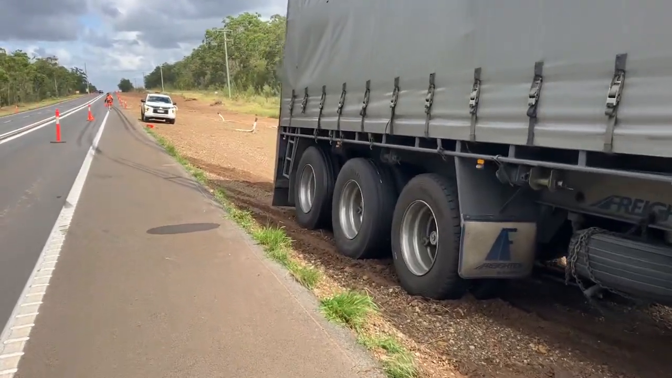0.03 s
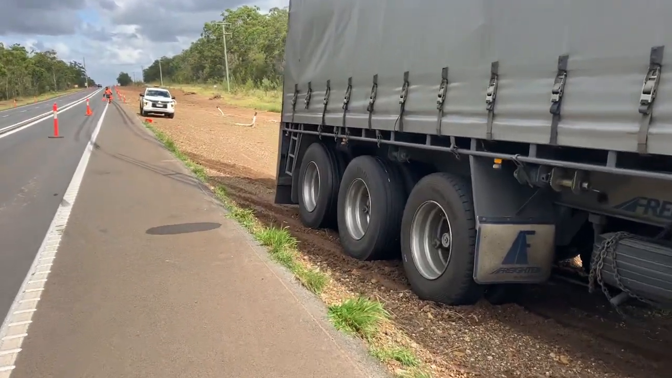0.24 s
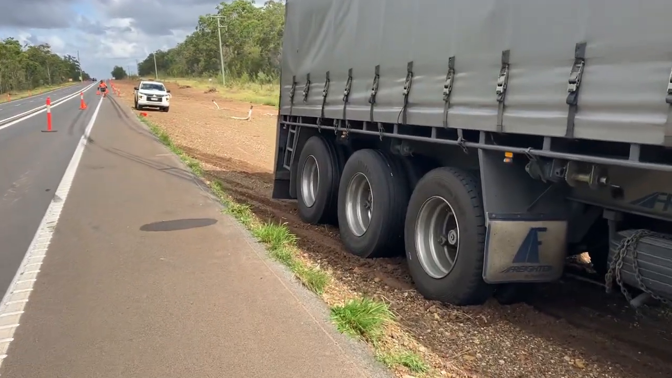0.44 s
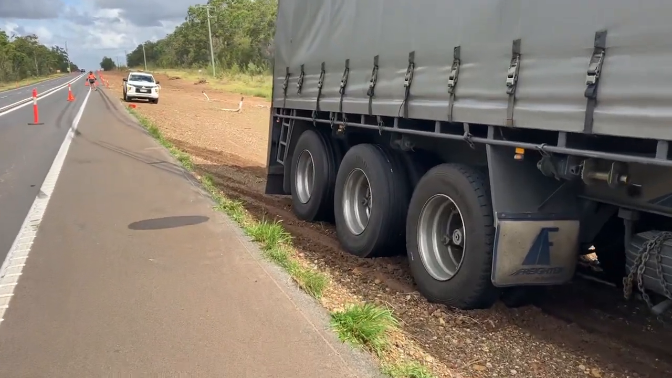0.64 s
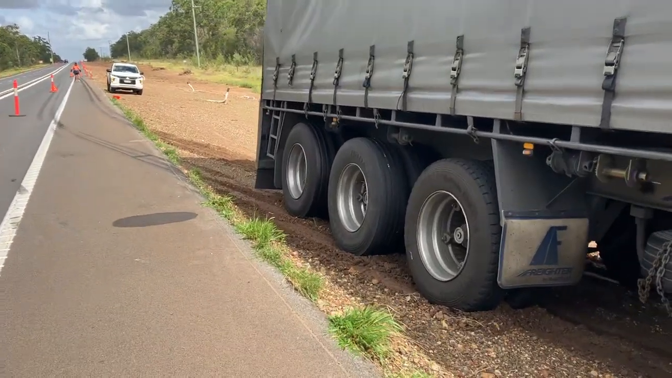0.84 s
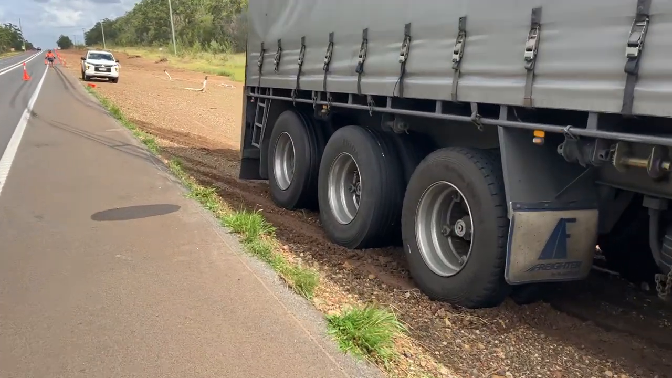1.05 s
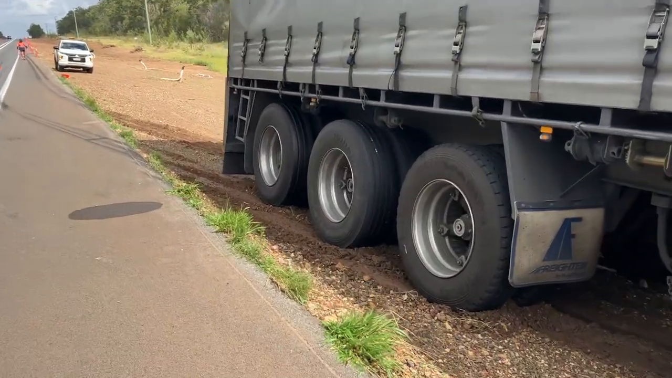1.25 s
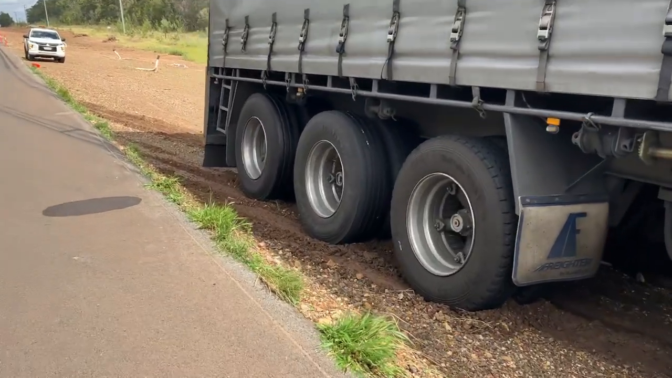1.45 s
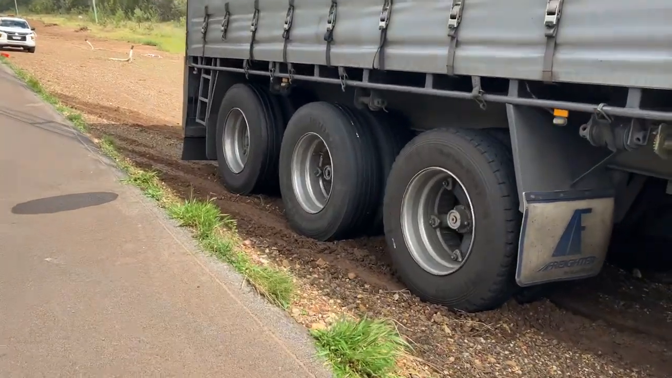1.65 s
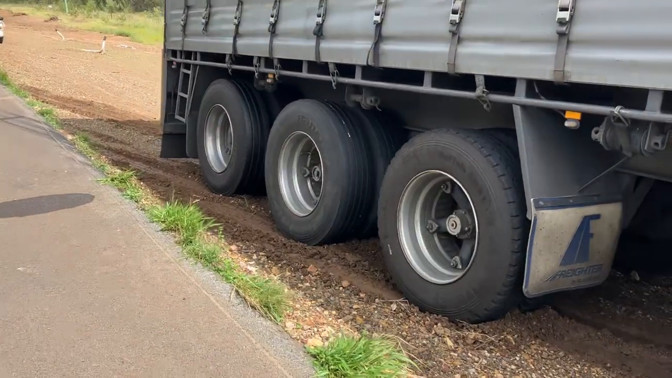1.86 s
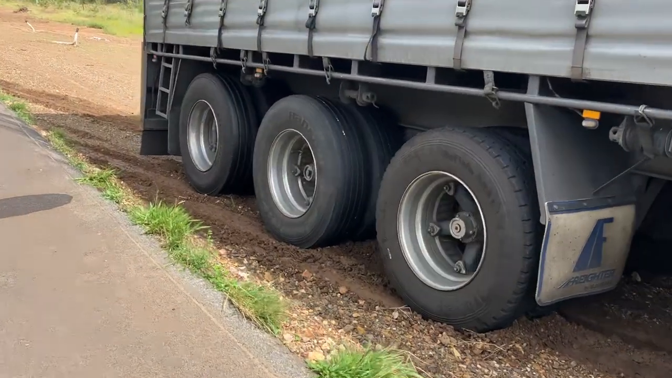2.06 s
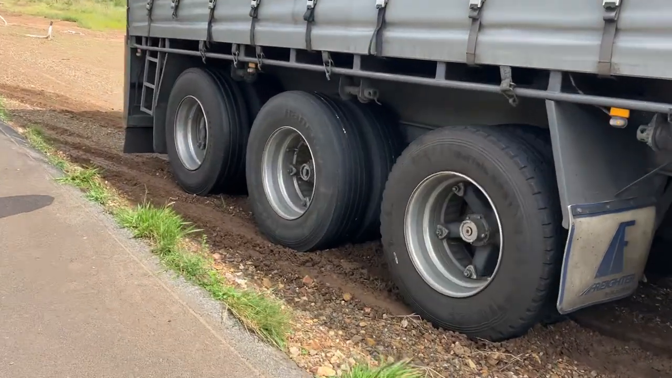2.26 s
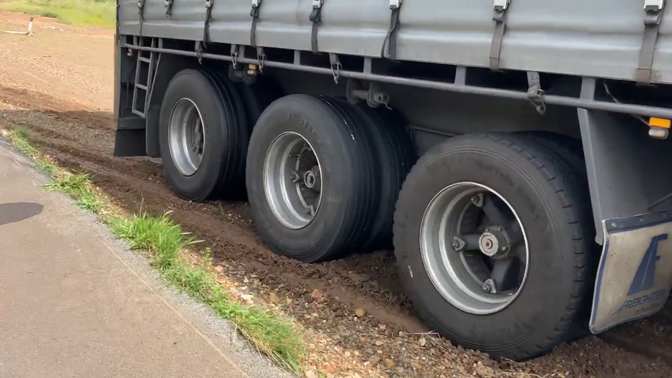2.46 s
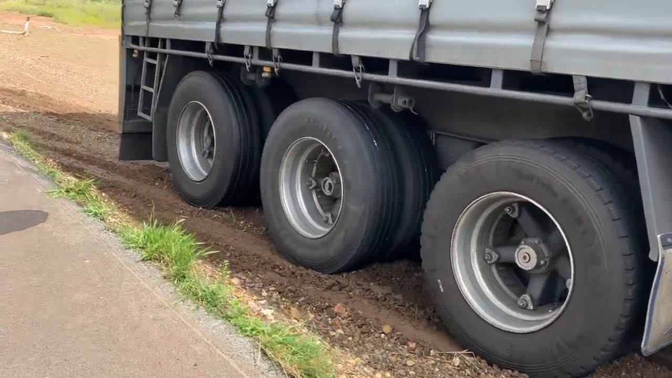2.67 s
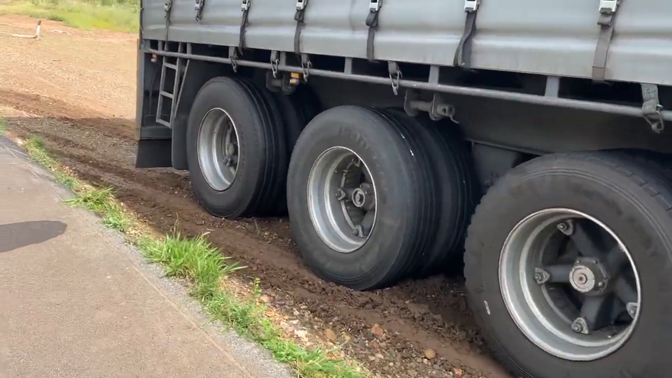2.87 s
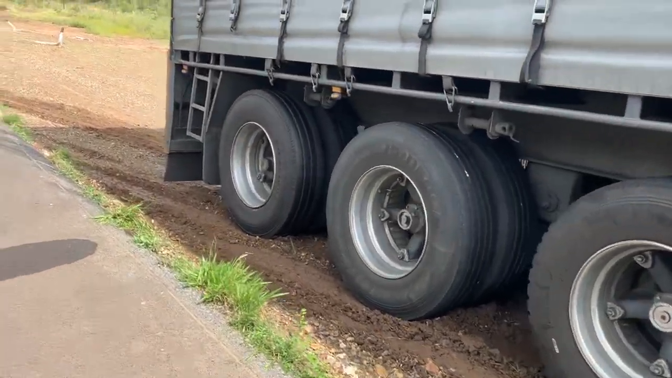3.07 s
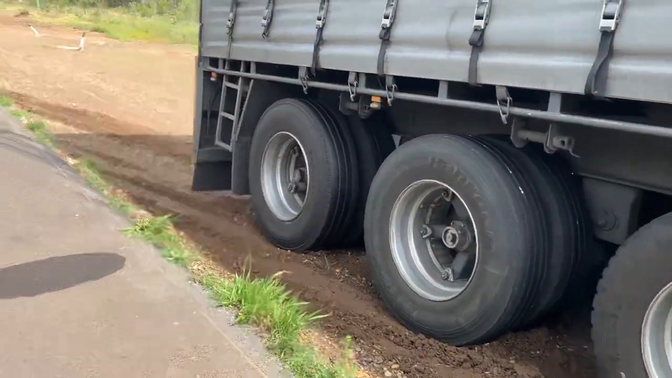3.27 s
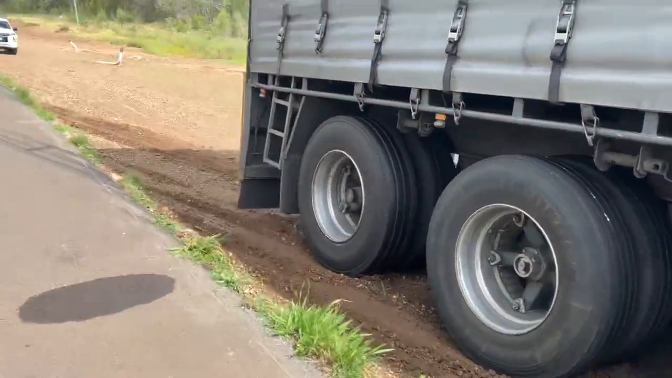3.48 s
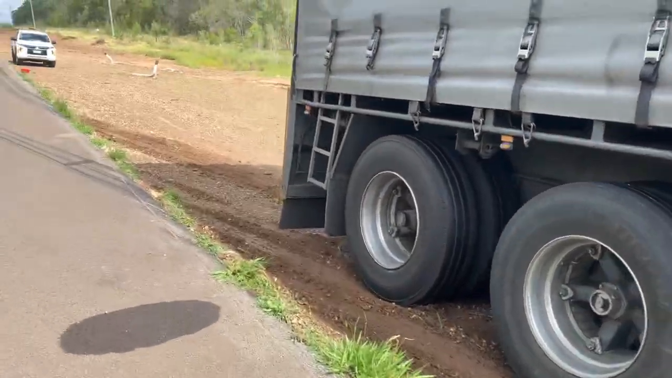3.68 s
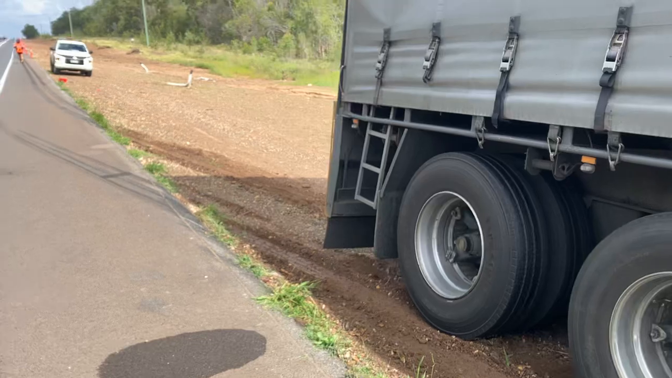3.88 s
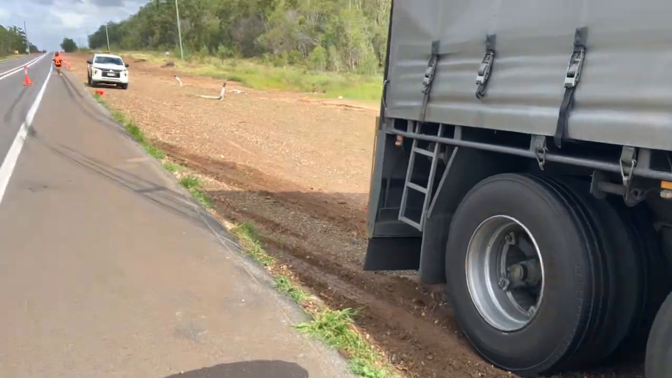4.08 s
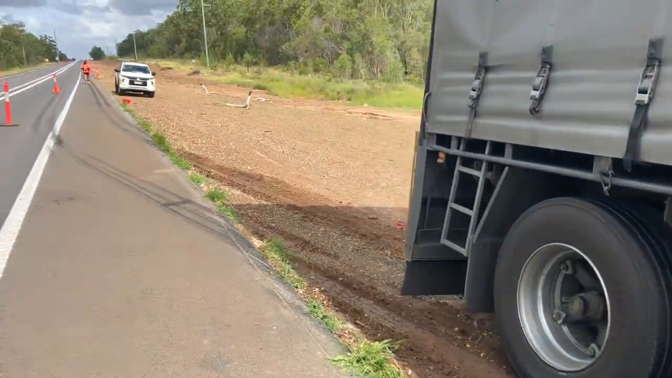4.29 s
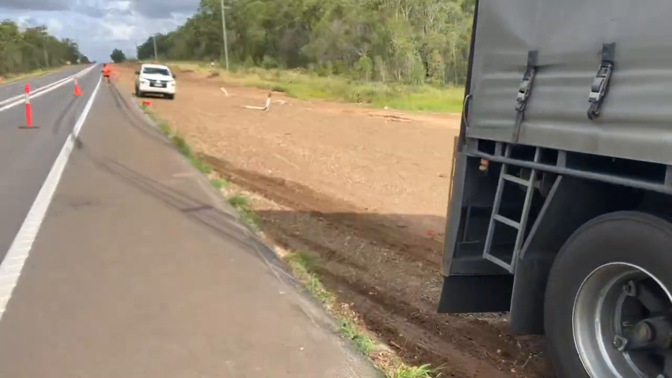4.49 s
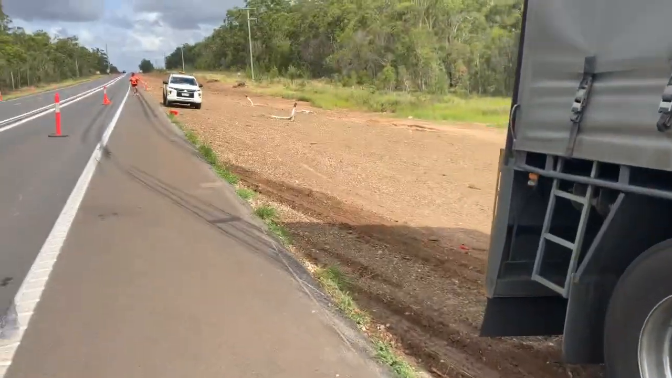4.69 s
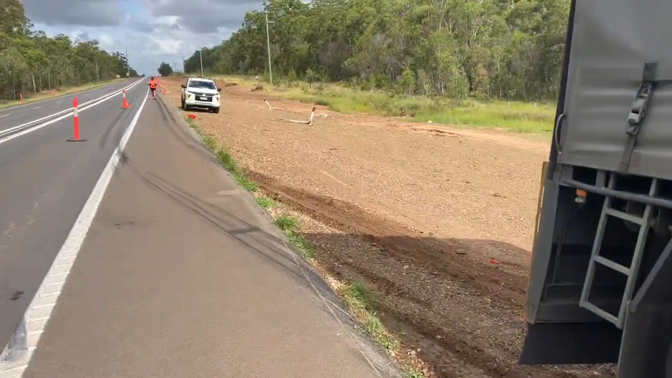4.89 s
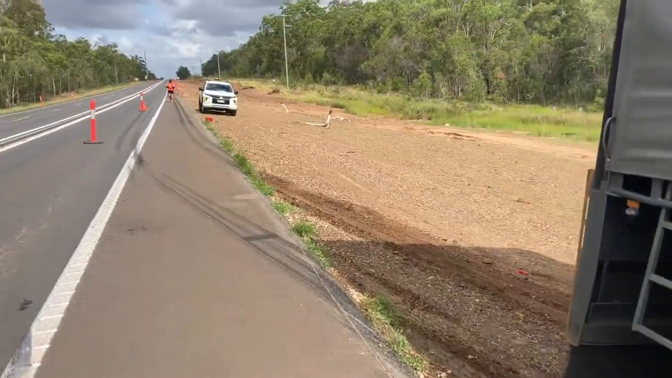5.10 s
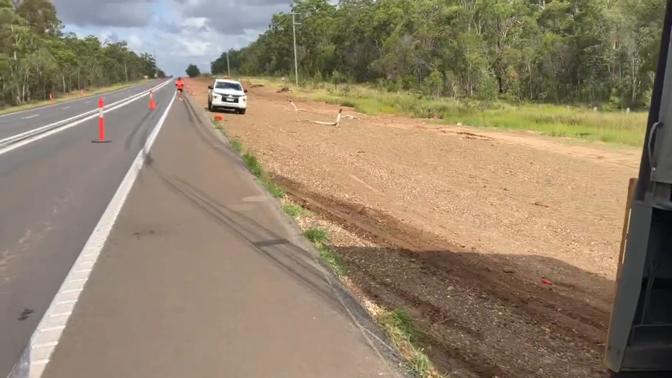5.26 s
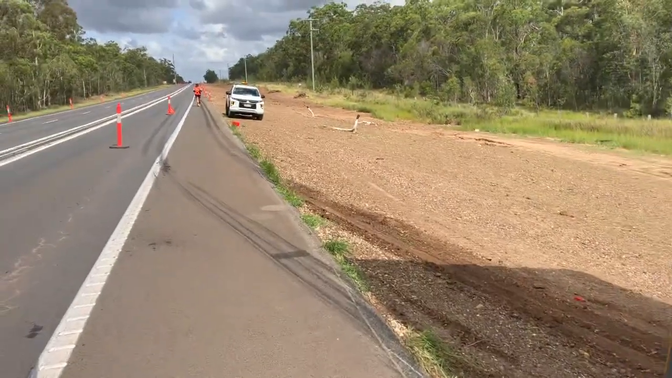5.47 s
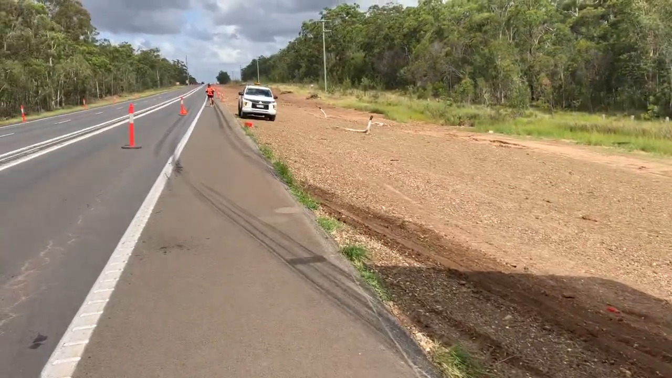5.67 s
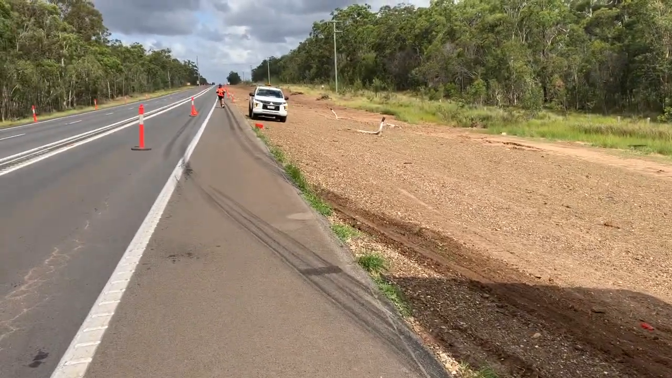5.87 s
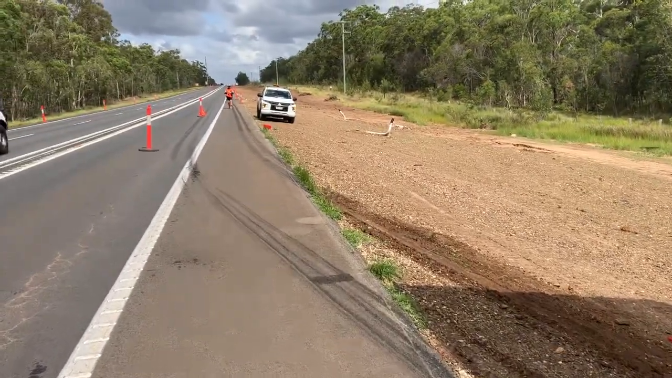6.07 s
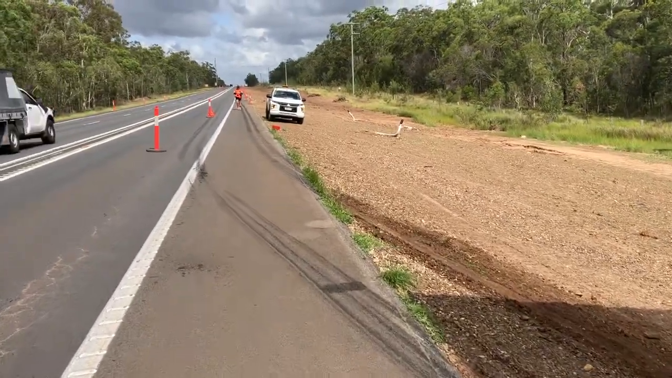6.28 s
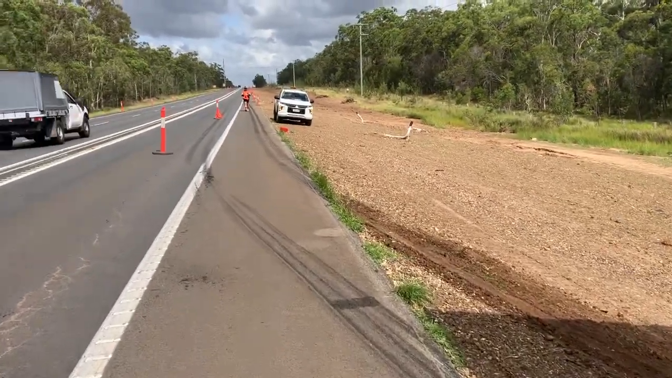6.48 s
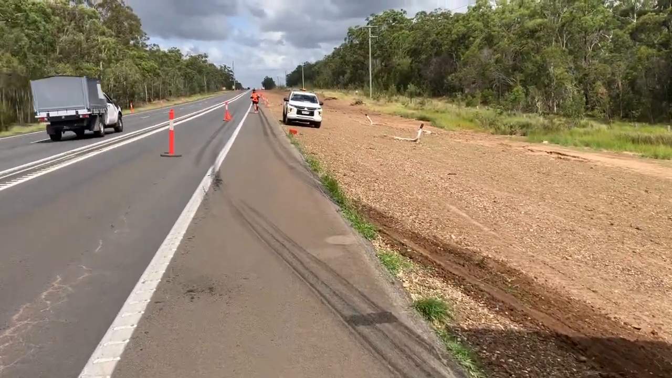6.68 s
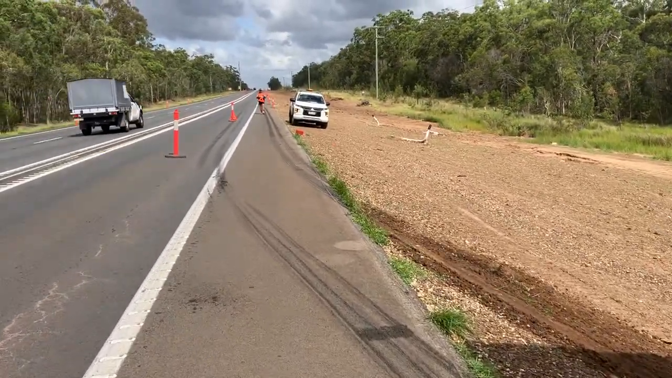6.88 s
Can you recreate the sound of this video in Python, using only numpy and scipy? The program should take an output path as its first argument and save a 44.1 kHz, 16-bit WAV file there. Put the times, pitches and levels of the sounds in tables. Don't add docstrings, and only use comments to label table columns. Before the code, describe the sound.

From 0 s a parked lorry idles nearby: a deep, unsteady boom near 60 hertz, weaker engine pulses, loose rumble and a faint fan whirr. Fine insect and leaf hiss sways around it, while an earlier car's soft tyre wash lingers in the distance. Tiny cooling-metal ticks crack at irregular moments, clearest near 0.45, 2.4, 2.8, 3.4, 4.0 and 4.5 s. Behind the trailer a pickup's low tyre hum and rough roar gradually grow, surging through a gap near 4 s. Around 4.7 s the whine, roar and hiss burst into the open, strongest about 5 to 5.4 s, with a beating edge. The pitch slides down as it passes; the whine falls away by 5.8 s. Rougher rear-tyre roar and hiss linger to about 7 s, over the idle and stronger insects. The turning hand-held phone shifts the stereo image and brightness.

```python
import sys
import numpy as np
from scipy import signal
from scipy.fft import rfft, irfft, next_fast_len
from scipy.io import wavfile
from scipy.ndimage import uniform_filter1d, map_coordinates

SR = 44100
rng = np.random.default_rng(int(sys.argv[2]) if len(sys.argv) > 2 else 0)


def wrap_up_sound(samples):
    columns = np.atleast_2d(samples).T
    tamed = np.clip(columns, -1, 1)
    steps = np.round(tamed * 32767).astype(np.int16)
    wavfile.write(sys.argv[1], SR, steps)


def volts_from_decibels(level):
    exponent = np.asarray(level, float) / 20
    return 10 ** exponent


N = 306054
T = np.arange(N) / SR

PASS_S, SPEED_M_S, MISS_M, WHEEL_HZ = 5.2, 13.5, 5.5, 7.09
TURN_S = 4.62
BURST_S = 4.75
ROAR_DIP_S, ROAR_RETURN_S = 5.48, 6.4

# multiple_of_boom, level_db
CRANK_ORDERS = [(0.497, -59), (1.25, -56), (1.5, -45.5), (1.999, -52.5), (2.25, -50), (2.5, -48.5),
                (3.5, -49.5), (5, -57), (5.3, -60), (6.801, -60.5)]
# start-to-end centre_s, length_s, level_db
BOOM_SWELLS = [(0.027, 0.23, -38.5), (0.92, 0.38, -33), (1.62, 0.63, -32), (2.062, 0.52, -35.5),
               (2.533, 0.61, -29), (3.025, 0.35, -35.5), (3.35, 0.12, -36), (3.56, 0.17, -34),
               (4.006, 0.36, -32), (4.426, 0.31, -32), (4.97, 0.35, -27), (5.457, 0.59, -25),
               (6.003, 0.34, -25.5), (6.449, 0.49, -31.5), (6.936, 0.24, -26)]
# pitch_hz, level_db (per Hz)
RUMBLE_COLOUR = [(13, -42), (25, -18), (45, -4), (70, 10.5), (110, -1), (190, -5), (250, -3.5),
                 (350, -14.5), (480, -13.5), (900, -37.5), (1500, -41), (3000, -104)]
# time_s, level_db
LEAVING_LEVEL = [(0, -54), (1.15, -53), (1.4, -53.5), (2.2, -54.5), (3.1, -54), (4, -53), (4.6, -45),
                 (5.2, -41.5)]
# time_s, left_lag_samples
LEAVING_BEARING = [(0, -17.3), (1.1, -15.5), (1.6, -12.8), (2, -10.6), (3.3, -9.6), (4.4, -8.6), (5, -13),
                   (5.6, -12.3), (6.05, -10.8), (6.94, -10.6)]
# pitch_hz, level_db (per Hz)
LEAVING_COLOUR = [(500, -55), (900, 7), (1300, 6), (2000, 5), (3350, -2), (3700, -2.5), (5500, -10.5),
                  (8000, -34), (12000, -64)]
# time_s, level_db
INSECT_LEVEL = [(0, -62.5), (.9, -60), (1.2, -59), (1.7, -60.5), (2.2, -59.5), (2.8, -59), (4.2, -60.5),
                (5.6, -56), (6.3, -54), (6.94, -56)]
# pitch_hz, level_db (per Hz)
BUSH_COLOUR = [(1000, -30), (3000, -7), (5500, -5), (6600, -1.5), (8000, 0), (9500, 0), (10500, -3),
               (12000, -13), (13500, -21), (16000, -24), (17000, -80)]
# start_s, peak_db
METAL_TICKS = [(.037, -68), (.4454, -55.5), (1.0036, -72), (1.0196, -65), (1.6457, -73), (2.2358, -70),
               (2.376, -57), (2.8175, -59), (2.837, -58), (3.1597, -72), (3.3987, -60), (3.4216, -69),
               (3.5359, -60), (3.9574, -65), (3.9759, -53), (4.0452, -71), (4.142, -70), (4.3849, -71),
               (4.5256, -66)]
# start_s, peak_db, pitch_hz, ring_t60_s
METAL_SNAPS = [
    (.4663, -58, 15300, .03),
    (2.852, -57, 5000, .01),
    (4.5431, -53, 15000, .012),
    (4.5555, -53, 15300, .03),
]
# time_s, left_lag_samples, treble_pan_db (left over right), scatter_db
PICKUP_BEARING = [(0, 13.5, 0, -7), (1.5, 17.5, -8, -6), (2.9, 17.5, -17.5, -4), (3.6, 14, -27, -1),
                  (3.92, 12, -25, .5), (4.05, -9, -14, 1.5), (4.3, -10, -6, 1), (4.55, -9.3, -3, -3),
                  (4.72, -10.3, -4, -5), (4.92, -15.5, -3, -6), (5.1, -17.5, -2, -7),
                  (5.35, -16.6, -.5, -8), (5.5, -13.8, 0, -10), (5.58, -12.3, 0, -20),
                  (5.68, -11.8, 0, -18), (5.76, -11.7, 0, -13), (5.92, -11.3, 0, -15), (6.08, -9, 0, -16),
                  (6.94, -9, -1, -14)]
# time_s, left_lag_samples
ROAR_BEARING = [(0, 13.5), (1.5, 17.5), (2.9, 17.5), (3.92, 13), (4.02, -14), (4.3, -9), (4.55, -7.5),
                (4.75, -10.5), (5, -13.5), (5.2, -13.5), (5.45, -12.5), (5.55, -11.8), (5.92, -11.3),
                (6.08, -8.6), (6.4, -8.5), (6.94, -8.6)]
# pitch_hz, width_hz, level_db
CARCASS = [(102, 150, -3.5), (155, 18, -32), (176, 117, -9.5)]
# pitch_hz, width_hz, level_db
TREAD_BLOCKS = [(313.6, 22, 0)]
# pitch_hz, width_hz, level_db
FINE_TREAD = [(467, 20, -9.5), (616, 19, 2), (1149, 50, -4.5)]
# multiple_of_wheel_rate, ahead_db, behind_db
BELT_LINES = [(13.72, -9.5, -6), (20.81, 0, 4), (21.63, -1.5, 3), (23.85, -12, 1.5), (24.12, 5.5, -1),
              (26.17, -5, -11), (26.13, 4, -8), (28.4, -1, -0.5), (27.27, 3.5, -1), (28.8, -16, -24)]
# pitch_hz, level_db (per Hz)
ROAR_AHEAD = [(130, -49), (230, -0.5), (400, 1.5), (520, -3.5), (750, 3), (1000, -4), (1300, -4),
              (1900, -12.5), (2400, -25), (3500, -28.5), (6000, -82)]
# pitch_hz, level_db (per Hz)
ROAR_BEHIND = [(130, -36), (250, -1), (400, -13.5), (600, -3.5), (780, 0.5), (920, -10), (1150, -2.5),
               (1380, -2), (1500, -11.5), (1950, -7.5), (2370, -27), (3500, -22), (6000, -89)]
# pitch_hz, level_db (per Hz)
HISS_COLOUR = [(900, -52), (1500, 1), (1900, -1), (2400, 1.5), (2900, -7.5), (3600, -7), (5000, -11.5),
               (8000, -18), (12000, -21.5), (16000, -30.5), (17000, -90)]
# pitch_hz, right_lead_half_turns
TREBLE_TWIST = [(7400, 0), (8750, 1), (9500, 1), (11000, 2), (12250, 2), (12900, 3), (14400, 3), (15300, 4)]


def unit(x):
    return x / np.sqrt(np.mean(x ** 2) + 1e-20)


def curves(rows):
    s, *cols = np.transpose(rows)
    return [np.interp(T, s, c) for c in cols]


def wobble(rate):
    slow = T[::32]
    knots = rng.standard_normal(int(N * rate / SR) + 4)
    return np.interp(T, slow, map_coordinates(knots, [slow * rate]))


def step(s, width_s):
    return (1 + np.tanh((T - s) / width_s)) / 2


def bump(s, length_s):
    return np.exp(-((T - s) / length_s) ** 2)


def along(points, hz):
    f, db = np.transpose(points)
    return volts_from_decibels(np.interp(np.log(hz + 1), np.log(f + 1), db))


def shaped(x, response):
    m = next_fast_len(x.shape[-1] + 4096)
    return irfft(rfft(x, m) * response(np.fft.rfftfreq(m, 1 / SR)), m)[..., :x.shape[-1]]


def rush(spectrum, patchy_db, channels=1):
    hz, _, z = signal.stft(rng.standard_normal((channels, N + SR // 4)), SR, nperseg=1024)
    field = uniform_filter1d(rng.standard_normal(z.shape[1:]), size=8, axis=0)
    field = uniform_filter1d(field, size=8, axis=1)
    z = z * volts_from_decibels(patchy_db * unit(field)) * along(spectrum, hz)[:, None]
    return unit(signal.istft(z, nperseg=1024)[1])


def ports(x, lag, pan_db=0, order=3):
    left = map_coordinates(x, [np.arange(N) - lag], order=order, mode="nearest")
    return np.array([left * volts_from_decibels(pan_db / 2), x * volts_from_decibels(-pan_db / 2)])


def lorry():
    boom_hz, floor_db, swell_shape = 59.73, -49, 2.8
    slow = T[::32]
    swells = sum(volts_from_decibels(db) * np.exp(-np.abs(2 * (slow - s) / length) ** swell_shape)
                 for s, length, db in BOOM_SWELLS)
    swell = volts_from_decibels(floor_db) + np.interp(T, slow, swells)
    tone = swell * volts_from_decibels(wobble(12)) * np.sin(2 * np.pi * boom_hz * T + 0.56 * wobble(7.7))
    crank = 2 * np.pi * boom_hz * T + 0.5 * wobble(1.38)
    for k, db in CRANK_ORDERS:
        tone += volts_from_decibels(db + 2.25 * wobble(3.61)) * np.sin(k * crank + 2 * np.pi * rng.random())
    fan_hz, fan_rise_hz_per_s, fan_db = 470, 4.5, -61
    whirr = np.sin(2 * np.pi * (fan_hz + fan_rise_hz_per_s * T / 2) * T + wobble(6))
    tone += volts_from_decibels(fan_db + 2 * T + 4 * wobble(5)) * (T < PASS_S) * whirr
    engine = np.sqrt(2) * np.array([np.roll(tone, shift=24), tone]) * volts_from_decibels([[-0.35], [0.35]])
    rumble = rush(RUMBLE_COLOUR, patchy_db=3.0, channels=3)[:, :N]
    spread = [(60, -12), (200, -10.5), (400, 0), (900, 13.0)]
    rumble = rumble[0] + shaped(rumble[1:], lambda f: along(spread, f))
    return engine + volts_from_decibels(-43.0 + wobble(2.8)) * rumble


def leaving_car():
    level_db, lag = curves(LEAVING_LEVEL) + curves(LEAVING_BEARING)
    level_db = level_db - 30 * step(5.45, 0.15)
    hiss = rush(LEAVING_COLOUR, patchy_db=0.8, channels=3)[:, :N]
    wide = ports(hiss[0], lag, pan_db=-4.5) + volts_from_decibels(-10) * hiss[1:]
    return volts_from_decibels(level_db + wobble(23.15)) * wide


def bush():
    level_db = curves(INSECT_LEVEL)[0] + 0.5 * wobble(3)
    return volts_from_decibels(level_db) * rush(BUSH_COLOUR, patchy_db=1.3, channels=2)[:, :N]


def ticks():
    tick_hz, tick_t60_s, ring_hz, ring_db = 12500, 0.013, 15300, -18
    out, t = np.zeros(N + SR), np.arange(900) / SR
    plain = [(*row, tick_hz, tick_t60_s) for row in METAL_TICKS]
    for s, db, hz, t60 in [*plain, *METAL_SNAPS]:
        click = volts_from_decibels(2.5 - 60 * t * hz / tick_hz / 0.00051) * np.sin(2 * np.pi * hz * t)
        ring = volts_from_decibels(ring_db - 60 * t / np.clip(t60, 0.005, 0.03)) * np.sin(2 * np.pi * ring_hz * t)
        ring = ring * (hz > 8000)
        out[round((s + 0.001) * SR):][:len(t)] += volts_from_decibels(db + 24) * (click + ring)
    return out[:N]


def peaks(modes, f):
    return sum(volts_from_decibels(db) * (f * w) ** 2 / ((c * c - f * f) ** 2 + (f * w) ** 2) for c, w, db in modes)


def grain(modes, sent):
    x = shaped(rng.standard_normal(N + SR // 4), lambda f: peaks(modes, f))
    return unit(np.interp(sent * SR, np.arange(len(x)), x))


def tread(modes, turns):
    order = np.arange(200)
    lines = rng.standard_normal(200) + 1j * rng.standard_normal(200)
    pattern = irfft(peaks(modes, order * WHEEL_HZ) * lines, 8192)
    return unit(np.interp(turns % 1 * 8192, np.arange(8192), pattern))


def passing(loudest_s, peak_db, reach_m, growth, hidden_db):
    away = np.hypot(1, SPEED_M_S * (T - loudest_s) / reach_m)
    return peak_db - growth * 20 * np.log10(away) - hidden_db * (1 - step(4.64, 0.32))


def tyre_hum(sent, turns, beat_db):
    level_db = passing(loudest_s=5, peak_db=-24, reach_m=11.5, growth=1.12, hidden_db=2)
    level_db = level_db - 0.12 * beat_db - 4 * step(ROAR_DIP_S + 0.61, 0.22)
    behind = step(PASS_S + 0.25, 0.071)
    belt = sum(volts_from_decibels(a + (b - a) * behind + 4 * wobble(6)) * np.sin(2 * np.pi * (k * turns + rng.random()))
               for k, a, b in BELT_LINES)
    return volts_from_decibels(level_db) * (0.83 * unit(belt) + 0.67 * grain(CARCASS, sent))


def trailer_surge(turns):
    line = np.sin(2 * np.pi * 20.81 * turns + 1.5 * wobble(8.9))
    return volts_from_decibels(-31) * bump(3.98, 0.22) * line


def tread_whine(sent, turns, beat_db):
    level_db = passing(loudest_s=5, peak_db=-23.5, reach_m=7, growth=1, hidden_db=-0.5)
    level_db = level_db + beat_db - 13.5 * step(5.8, 0.12) - 11 * (1 - step(4.78, 0.03))
    return volts_from_decibels(level_db) * (0.57 * tread(TREAD_BLOCKS, turns) + 0.54 * grain(TREAD_BLOCKS, sent))


def roar_level():
    level_db = passing(loudest_s=5.5, peak_db=-25, reach_m=6.5, growth=1.32, hidden_db=2.5)
    level_db = level_db + 0.6 * wobble(11) + 3 * bump(BURST_S, 0.24)
    return level_db - 5 * step(ROAR_DIP_S, 0.2) + 5.5 * step(ROAR_RETURN_S, 0.48)


def rear_drone(turns, roar_db, gone):
    line = np.sin(2 * np.pi * 86.6 * turns + 0.74 * wobble(9))
    return volts_from_decibels(roar_db - 13.5 + 2.5 * wobble(5.12)) * gone * line


def road_roar(sent, roar_db, gone):
    ahead = rush(ROAR_AHEAD, patchy_db=1.3, channels=3)
    wake = rush(ROAR_BEHIND, patchy_db=1.3, channels=3)
    front, rear = [np.interp(sent * SR, np.arange(N + SR // 4), x[0, :N + SR // 4]) for x in (ahead, wake)]
    direct = np.sqrt(1 - gone) * front + np.sqrt(gone) * rear
    direct = direct + (0.25 + 0.2 * gone) * grain(FINE_TREAD, sent)
    around = np.sqrt(1 - gone) * ahead[1:, :N] + np.sqrt(gone) * wake[1:, :N]
    return volts_from_decibels(roar_db + 2.5) * direct, volts_from_decibels(roar_db - 4 * gone) * around


def tyre_hiss():
    level_db = passing(loudest_s=5.5, peak_db=-37.5, reach_m=10, growth=2.5, hidden_db=4.5)
    level_db = level_db + 2.6 * step(ROAR_RETURN_S + 0.059, 0.41) + 4 * bump(BURST_S - 0.11, 0.2)
    hiss = rush(HISS_COLOUR, patchy_db=0.7, channels=3)[:, :N]
    return volts_from_decibels(level_db + 5 + 0.6 * wobble(12)) * hiss


def round_phone(f, centre_hz=2820, width_hz=800):
    lean = 1j * f * width_hz
    return (centre_hz ** 2 - f * f - lean) / (centre_hz ** 2 - f * f + lean)


def bent_round_phone(right):
    edge = np.clip(step(5.15, 0.038) * (0.97 - 0.06 * (T - 5.15)), 0, 1)
    late = step(6.45, 0.11)
    bent = (1 - late) * shaped(right, round_phone)
    bent = bent + late * shaped(right, lambda f: round_phone(f, centre_hz=3150))
    return (1 - edge) * right + edge * bent


def pickup():
    away_m = np.hypot(MISS_M, SPEED_M_S * (T - PASS_S))
    sent = T + (away_m[0] - away_m) / 343
    turns = WHEEL_HZ * sent + 0.004 * wobble(2.02)
    beat_db = 2 * np.cos(2 * np.pi * 3.9 * (T - 4.93))
    gone = step(PASS_S + 0.55, 0.28)
    roar_db = roar_level()
    low = tyre_hum(sent, turns, beat_db) + trailer_surge(turns)
    low = low + tread_whine(sent, turns, beat_db) + rear_drone(turns, roar_db, gone)
    roar, roar_around = road_roar(sent, roar_db, gone)
    hiss = tyre_hiss()

    lag, pan_db, scatter_db = curves(PICKUP_BEARING)
    roar_pan_db = np.where(T > TURN_S, 0.5, 0.33 * pan_db)
    open_db = -13 + 9.5 * step(TURN_S, 0.16)
    direct = ports(low, lag, order=1)
    direct = direct + ports(roar, curves(ROAR_BEARING)[0], roar_pan_db, order=1)
    direct = direct + ports(volts_from_decibels(open_db) * hiss[0], lag, pan_db)
    direct[1] = bent_round_phone(direct[1])
    trees = 1.6 * step(6.3, 0.2) * shaped(hiss[1:], lambda f: np.clip(f / 500 - 4.6, 0, 1))
    return direct + volts_from_decibels(scatter_db - 3 * gone) * (roar_around + hiss[1:] + trees)


def scene():
    return lorry() + leaving_car() + bush() + ticks() + pickup()


def low_pass(x):
    return signal.sosfilt(signal.butter(12, 17060, fs=SR, output="sos"), x)


def record(dry):
    def share(f):
        return np.interp(f, [6700, 7250, 8300], [0, 0.7, 0.99])

    def twist(f):
        return np.exp(0.5j * np.pi * np.interp(f, *np.transpose(TREBLE_TWIST)) * [[-1], [1]])

    x = shaped(dry, lambda f: np.sqrt(1 - share(f)))
    x = x + shaped(dry[1], lambda f: np.sqrt(share(f)) * twist(f))
    top = shaped(x, lambda f: (f > 14600) & (f < 15850))
    x = shaped(x, lambda f: f <= 14600) + volts_from_decibels(5 * wobble(20) - 4.5) * top
    power = shaped(dry[1], lambda f: f > 12500) ** 2
    jump = uniform_filter1d(power, size=90) / (uniform_filter1d(power, size=4400) + 1e-14)
    sudden = uniform_filter1d(np.clip(jump / 3 - 1, 0, 1), size=90)
    x = x + 0.65 * sudden * shaped(dry - x, lambda f: (f > 8300) & (f < 15850))
    return low_pass(x)


dry = scene()
out = record(dry)
wrap_up_sound(out)
```